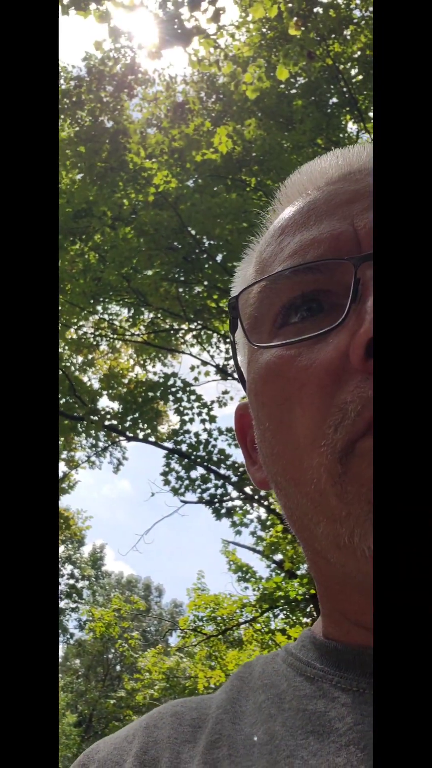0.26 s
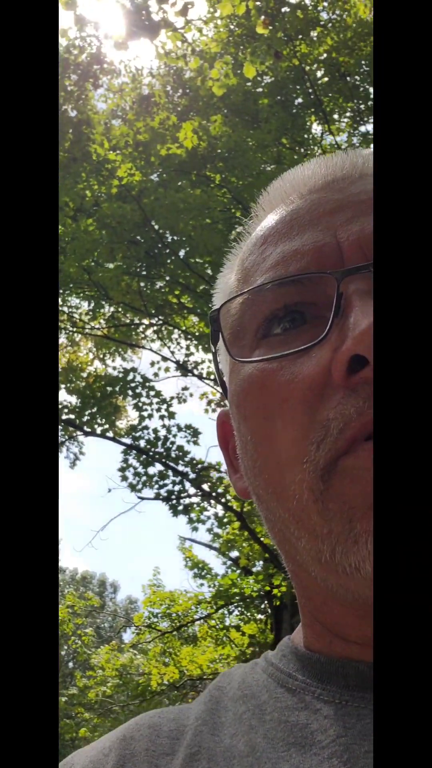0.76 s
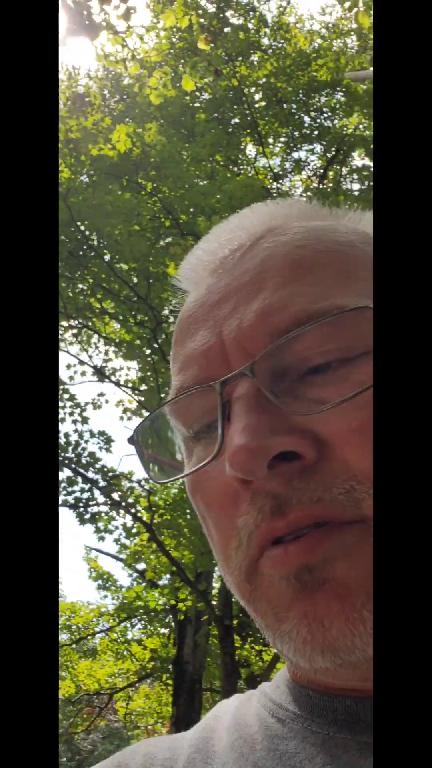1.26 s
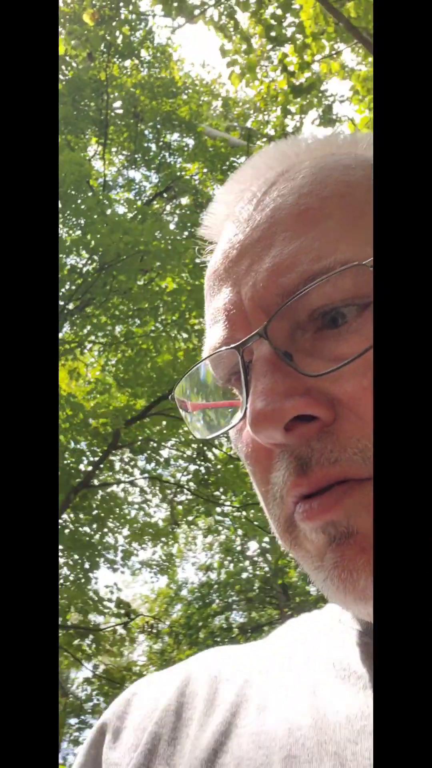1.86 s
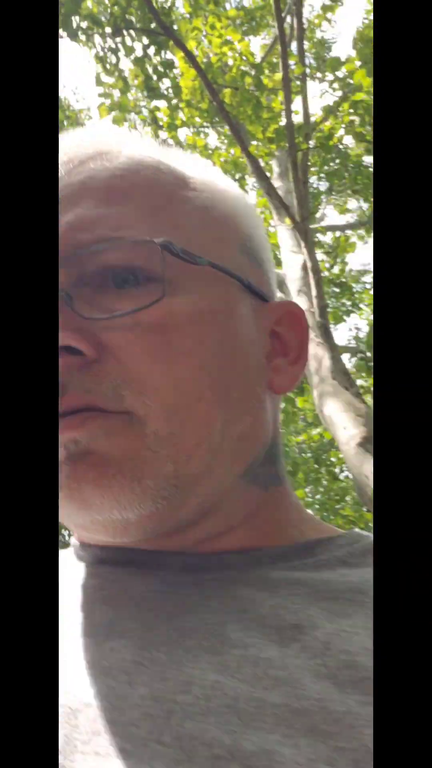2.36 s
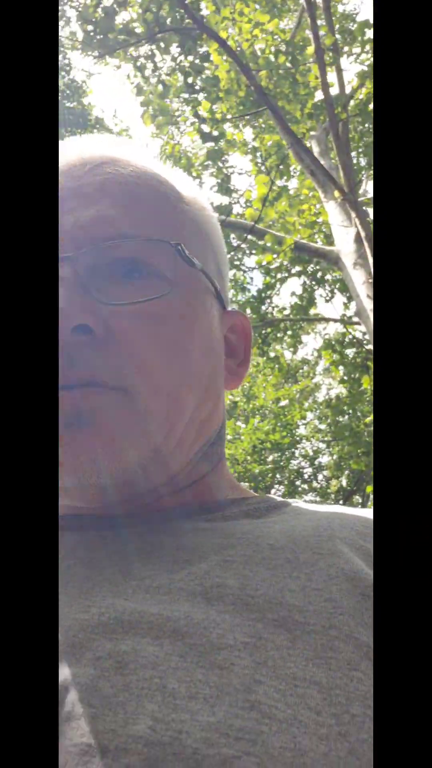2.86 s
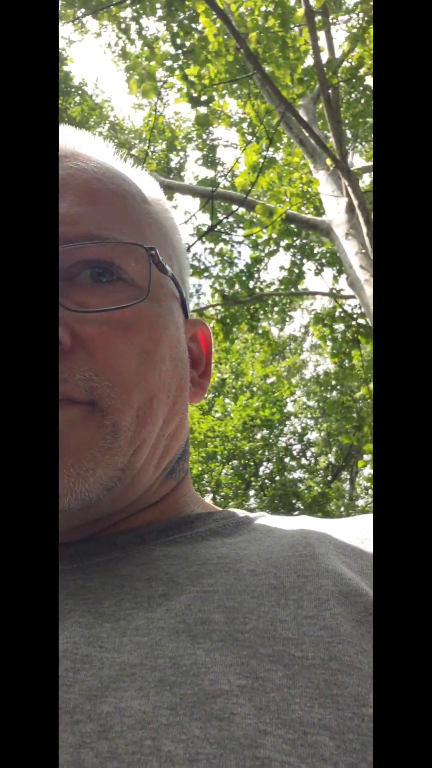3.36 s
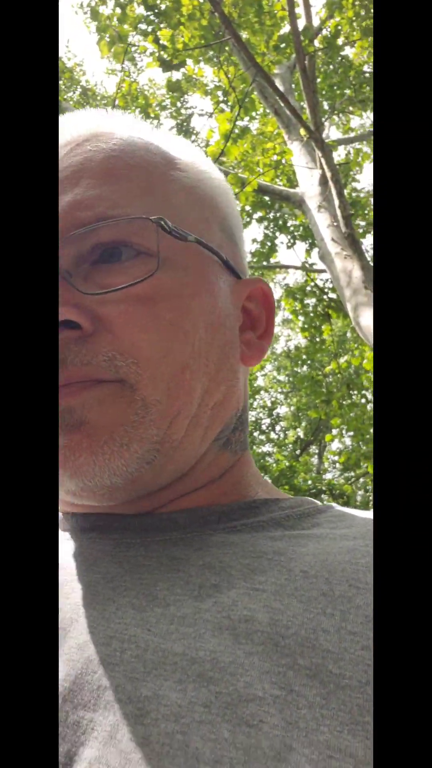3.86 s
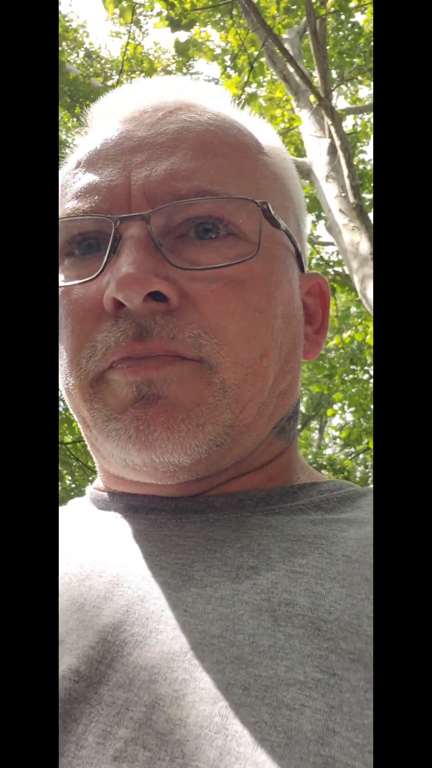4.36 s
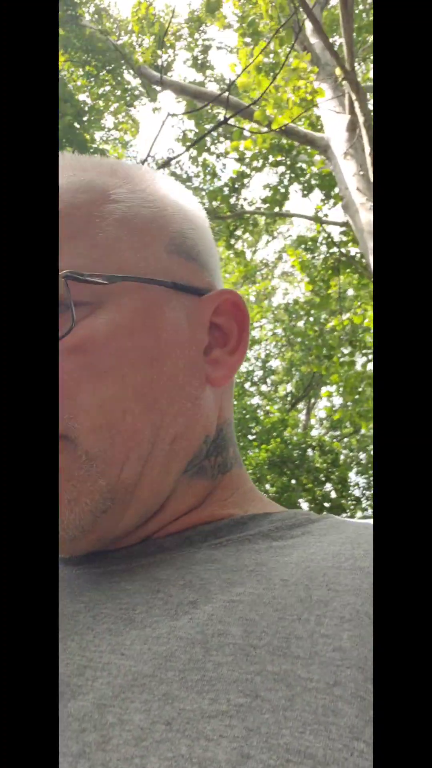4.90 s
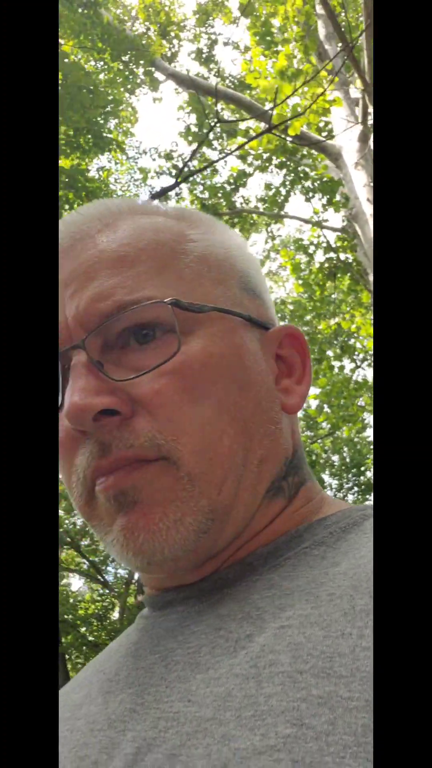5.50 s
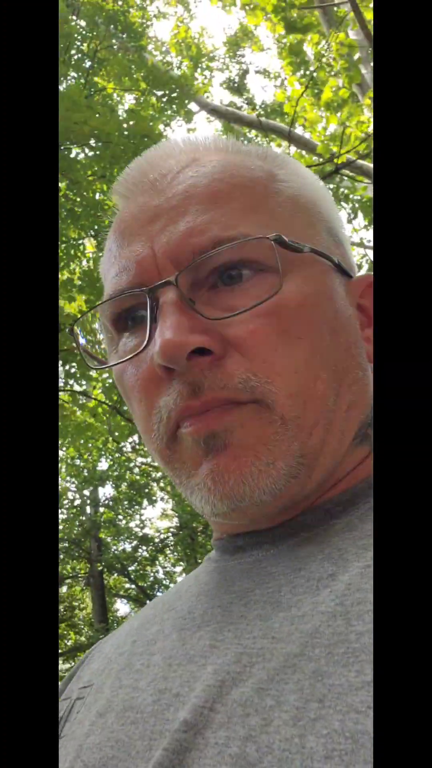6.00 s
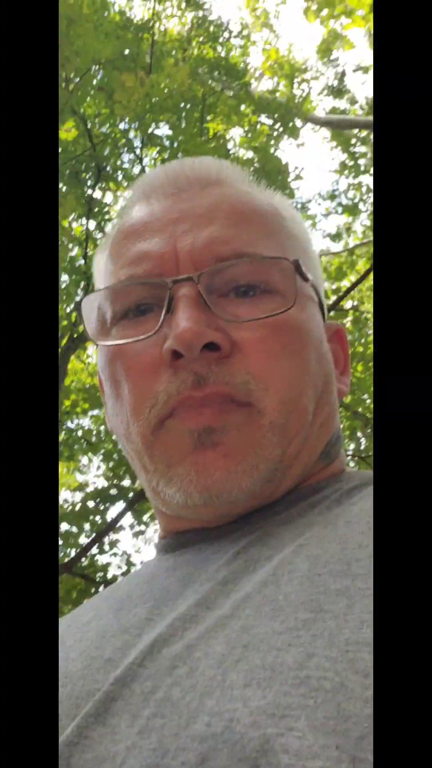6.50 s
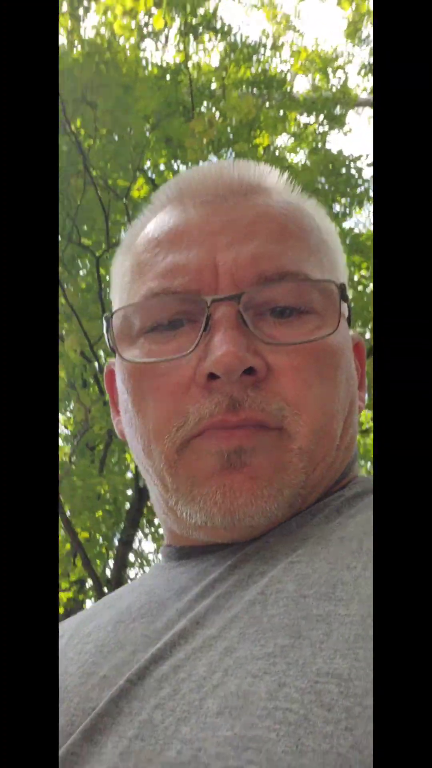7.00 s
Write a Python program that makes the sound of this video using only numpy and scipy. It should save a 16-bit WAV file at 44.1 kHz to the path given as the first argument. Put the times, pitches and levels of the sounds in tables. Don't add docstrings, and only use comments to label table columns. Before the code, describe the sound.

An electric starter clatters and whines for half a second, then a big V-twin catches with loud bangs, stumbles, and settles into a lumpy idle.

```python
import sys
import numpy as np
from scipy import signal
from scipy.fft import rfft, irfft
from scipy.io import wavfile
from scipy.ndimage import map_coordinates

SR = 44100
rng = np.random.default_rng(int(sys.argv[2]) if len(sys.argv) > 2 else 0)


def convert_level_to_amplitude(level_db):
    exponent = np.asarray(level_db, float) / 20
    return 10 ** exponent


def log_audio(samples):
    frames = np.atleast_2d(samples).T
    limited = np.clip(frames, -1, 1)
    pcm = np.round(limited * 32767).astype(np.int16)
    wavfile.write(sys.argv[1], SR, pcm)


N = 319725
TIME_S = np.arange(N) / SR

# (frequency [Hz], level [dB], t60 [s], polarity [+-1])
FRONT_PIPE_MODES = [(55.3, -13.1, 0.442, 1), (63.0, -20.6, 0.418, 1), (91.9, -14.2, 0.216, -1),
                    (108.3, -18.1, 0.277, -1), (142.1, -8.1, 0.148, -1), (188.1, -4.7, 0.078, -1),
                    (228.9, -12.9, 0.073, 1), (342.0, -12.0, 0.016, 1)]
REAR_PIPE_MODES = [(47.4, -14.8, 0.6, 1), (53.2, -10.7, 0.6, 1), (89.6, -15.0, 0.524, 1),
                   (103.6, -2.5, 0.127, -1), (139.0, -10.0, 0.163, -1), (179.9, -18.2, 0.244, -1),
                   (202.7, -2.7, 0.038, 1), (342.0, -24.1, 0.015, -1)]
# (time [s], pitch [ratio], front sharpness [dB/octave], rear sharpness [dB/octave])
PIPE_GAS = [(0.6, 0.962, -3.9, 5.5), (0.9, 1.113, 3.2, 6.0), (1.3, 1.083, 4.2, 5.0),
            (1.7, 1.031, -0.3, 4.9), (2.2, 0.973, 3.0, 4.2), (2.8, 0.983, -1.8, 0.4),
            (3.5, 0.989, 0.4, 0.1), (4.5, 0.994, -0.0, -0.0), (5.5, 0.998, -0.5, 0.4),
            (6.3, 0.995, -1.4, 0.4), (7.2, 1.001, -0.5, 0.1)]
# (time [s], level [dB], frequency [Hz], t60 [s])
FIRST_BANGS = [(.125, -23, 50, 0.182), (0.114, -23, 129, .1), (.268, -9, 114, 0.18), (.365, -13, 53, 0.15),
               (0.351, -19.5, 189.4, 0.1), (.54, -17, 65, 0.13), (0.576, -5, 94.7, 0.098),
               (.586, -3.5, 61.4, 0.176), (0.604, 3.5, 122, 0.085), (0.645, 0, 117.3, 0.083),
               (0.663, 2, 69, 0.074)]

# (frequency [Hz], density [dB per Hz])
AWAY_COLOUR = [(260, -27), (450, 1), (617, -6.5), (686, -7), (1030, -7.5), (1720, -12.5), (1910, -9.5),
               (2460, -19), (3530, -25), (3810, -23), (6360, -26.5), (8460, -25), (13700, -25),
               (15400, -24.5), (16400, -51)]
SIDE_ON_COLOUR = [(330, -69), (560, -6), (635, -7), (731, -2.5), (840, -7), (1130, -10), (1490, -13),
                  (1890, -9.5), (2210, -17), (2960, -22.5), (4600, -19), (6700, -19), (8500, -14.5),
                  (9700, -17.5), (10800, -12), (12400, -10), (15900, -14)]
TOWARDS_COLOUR = [(290, -35), (500, -2), (604, -12), (718, -10), (1110, -23.5), (1360, -18.5),
                  (1590, -22.5), (1790, -17), (1980, -22), (2250, -25), (2600, -30), (3580, -28),
                  (7000, -28.5), (8500, -26.5), (9720, -27), (13800, -21.5), (15900, -31.5)]
TURN_TIMES_S = (1.699, 2.198, 4.9, 5.5)
# (frequency [Hz], likeness [0-1])
PORT_LIKENESS = [(60, 1), (250, 0.42), (500, 0.74), (1000, 0.73), (2000, 0.13), (15000, 0.1)]
# (clatter [dB], hiss [dB], rasp [dB], rumble [dB])
POSE_LEVELS = [
    (-38, -49, -42, -27),
    (-38, -44, -35, -31),
    (-39, -49, -36.5, -30.5),
]
# (middles [dB], highs [dB], left lag [ms], booms [dB])
POSE_BALANCE = [
    (-5, -2.6, 0.353, .5),
    (-1.3, -5, .13, 0),
    (-1.5, -5.8, .14, -.6),
]
# (time [s], width [s], share [-1 to 1])
HAND_LEANS = [
    (2.3, 0.71, 0.46),
    (5.2, 0.35, -0.33),
    (6.6, 0.18, 0.6),
    (7.02, 0.073, 0.96),
]
LEAN_GAIN_DB = (2.5, 2, 6, 0.5)

# (frequency [Hz], density [dB per Hz])
STARTER_NOISE_COLOUR = [(190, -34), (330, 2), (401, 1.5), (429, -4), (585, 0), (986, -7), (1240, -1.5),
                        (1690, -5.5), (1840, -4.5), (2460, -10), (5860, -15), (7480, 0.5), (12600, 1.5),
                        (15600, 1), (16400, -29)]
# (time [s], whine [Hz], strain [0-1])
STARTER_CRANK = [
    (0, 249, .85),
    (.06, 232.8, 0.4),
    (.14, 214.5, 0.03),
    (.205, 295.2, 0.6),
    (.27, 135.6, 0.9),
    (.33, 236.5, 0.51),
    (.465, 244.2, 0.34),
    (.5, 275.3, 0.98),
    (.586, 167, 0.9),
]
# (at rest [dB], swing at full strain [dB])
STRAIN_LEVELS = [
    (-30.5, 8.4),
    (-46, 21.6),
    (-38, 11),
]
WHINE_HARMONICS_DB = (-8, -6, -14)
# (time [s], peak level [dB], rise [s], fall
# [s])
AIR_LEAKS = [
    (0, -19, .01, .15),
    (0.265, -16.5, 0.054, .035),
    (.36, -31, 0.13, 0.073),
    (0.419, -21, 0.0044, 0.057),
    (.538, -16.5, 0.045, 0.043),
    (.586, -26, .03, .08),
]
# (time [s], peak level [dB])
GEAR_TICKS_AT = [
    (.003, -29),
    (.096, -18),
    (.204, -22),
    (.222, -17),
    (.333, -25),
    (.382, -20),
    (.504, -15),
    (.569, -20),
    (.579, -19),
]
# (time [s], peak level [dB], t60 [s])
VALVE_SPITS = [
    (0.4175, -7.5, 0.042),
    (0.5871, -18, 0.045),
    (0.6153, -16, 0.048),
]
# (frequency [Hz], density [dB per Hz])
SPIT_NOISE_COLOUR = [(1760, -55), (3000, -28), (4630, -12.5), (5850, -21), (7500, -0.5), (8770, -6),
                     (12300, -12), (15100, -25), (16400, -41)]

# (cycle number, length of the four-stroke cycle [ms])
CYCLE_LENGTHS = [(0, 73.3), (1, 83.19), (2, 71.43), (4, 67.89), (10, 68.42), (15, 76.12), (16, 76.33),
                 (25, 87.46), (31, 87.65), (36, 93.6), (43, 91.93), (75, 92.43)]
HUNT_SLOWEST_CYCLES = [37.2, 42.28, 47.36, 52.44, 57.52, 62.6, 67.2, 71.1, 74.3, 77.4]
# (time [s], front level [dB], rear level [dB])
BURN_STRENGTH = [(.63, -.8, -4.9), (.7, .5, -2.3), (.78, 1, -2.1), (.92, -5.8, -1.8), (1.4, -5, -2),
                 (1.7, -3.4, -.9), (2.24, .1, -.3), (2.55, 1.2, -5), (3.15, 1.3, -6.6), (3.47, 0, -4.4),
                 (4.4, 1.2, -3.5), (5.5, 1.2, -1.9), (7.2, .4, -1.5)]
# (time [s], front loss [dB], rear loss [dB])
COLD_MISSES = [(.72, 0, 0), (.85, 0, 24), (.93, 0, 24), (1.05, 20, 24), (1.34, 20, 24), (1.47, 9.6, 19),
               (1.61, -2, 17.5), (1.92, -1.3, 12.7), (2.1, 0, 9.5), (2.33, 0, 9), (2.49, 0, 0)]
# (time [s], front level [dB], rear level [dB])
PIPE_JETS = [
    (.63, -27, -46),
    (.7, -50, -50),
    (.95, -48, -45),
    (1.95, -53, -51),
]
# (time [s], peak level [dB])
WARMING_JET_PUFFS = [(2.1107, -27), (2.2753, -23), (2.3377, -27), (2.409, -36), (2.4449, -28),
                     (2.5302, -28), (2.5871, -29), (2.6175, -28.5), (2.6734, -28), (2.7048, -30),
                     (2.7577, -28), (2.7936, -29), (2.848, -28), (2.8804, -30), (2.9358, -27),
                     (2.9687, -29), (3.0253, -28), (3.056, -36), (3.1122, -28), (3.1433, -35),
                     (3.2012, -26), (3.2336, -33), (3.291, -26), (3.3234, -34), (3.3798, -29),
                     (3.4137, -26), (3.47, -28), (3.5095, -27), (3.5679, -27), (3.6013, -30), (3.6607, -28),
                     (3.6937, -29), (3.754, -26), (3.7889, -30), (3.8453, -23), (3.8797, -31),
                     (3.9385, -25), (3.972, -28), (4.0283, -24), (4.0643, -28), (4.1206, -23),
                     (4.1565, -30), (4.2158, -25), (4.2503, -28), (4.3067, -25), (4.3406, -30),
                     (4.3955, -27), (4.4319, -29)]
IDLE_JET_PUFFS = [(4.4893, -24), (4.5262, -31), (4.5844, -25), (4.618, -33), (4.6769, -23), (4.7118, -30),
                  (4.7701, -17), (4.8599, -21), (4.8929, -36), (4.9512, -23), (5.044, -22), (5.1358, -22),
                  (5.1722, -30), (5.2291, -28), (5.2626, -32), (5.3201, -24), (5.3568, -31),
                  (5.4107, -23.5), (5.4496, -30), (5.5035, -24.5), (5.5429, -29), (5.5973, -25),
                  (5.6352, -28), (5.6876, -22), (5.7275, -30), (5.7797, -23), (5.82, -27), (5.8726, -23),
                  (5.9106, -32), (5.9644, -21), (6.0048, -27), (6.0577, -22.5), (6.0966, -29), (6.149, -22),
                  (6.1884, -32), (6.239, -20), (6.2771, -28), (6.3326, -22), (6.3715, -25), (6.4259, -25),
                  (6.4668, -25), (6.5201, -18.5), (6.5581, -25), (6.6095, -19), (6.6479, -24),
                  (6.6793, -30), (6.7012, -18.5), (6.7417, -22), (6.7731, -31), (6.7965, -22.5),
                  (6.836, -27), (6.8883, -19.5), (6.9262, -30), (6.9786, -17.5), (7.0185, -21),
                  (7.0505, -30), (7.0729, -19.5), (7.1128, -18.5), (7.1655, -20), (7.2046, -23)]
# (level [dB], fading [s])
CATCH_FLARE = [
    (7.5, 0.32),
    (9, 0.24),
    (17, 0.35),
    (4.5, 0.39),
]
# (share of the cycle [0-1], level over the hiss [dB])
VALVE_SEATINGS = [
    (.12, 1.5),
    (.345, 3.5),
    (.58, -5.5),
    (.77, 2.5),
]
# (time [s], peak level [dB])
ROUGH_KNOCKS = [(0.593, -6), (0.627, -17), (0.657, -12.5), (0.715, -15), (0.764, -19.5), (0.799, -14),
                (0.868, -17.5), (1.5, -29), (1.646, -25), (1.8, -27), (1.92, -31), (1.952, -26),
                (2.671, -30), (3.661, -30), (4.583, -21), (4.86, -24), (4.95, -25), (5.045, -29),
                (5.136, -24), (5.871, -27), (6.701, -25), (7.242, -15)]
# (time [s], frequency [Hz], level [dB])
MUFFLER_RASP = [
    (1.0, 428.3, 0),
    (1.8, 428, -1.5),
    (2.45, 422, -2),
    (2.9, 392.8, 0.5),
    (4.9, 398, 0),
    (5.5, 409.8, 0),
    (6.3, 418, 1.5),
    (7.2, 415.6, 1.5),
]

# (time [s], level [dB], width [s], frequency [Hz])
BRIEF_SQUEAKS = [
    (.05, -37, .02, 13070),
    (.085, -26, .012, 13070),
    (.335, -33, .01, 13130),
    (.382, -20, 0.0085, 13330),
    (1.108, -28, 0.0029, 3800),
]
# (start [s], end [s], first frequency [Hz], last frequency [Hz], level [dB], width [share of pitch])
CAVITIES = [(0.09, 0.23, 2480, 2560, -34, .05), (.33, .43, 2480, 2540, -37, .035),
            (0.62, 1.75, 2520, 2420, -45, 0.041), (-0.01, .07, 1880, 1700, -38, .04),
            (0.09, 0.13, 1950, 1900, -37, .05), (0.23, 0.26, 1800, 1930, -29, 0.044),
            (0.4344, .56, 1830, 2100, -29.5, 0.051), (0.52, .9, 1880, 1920, -44, .035),
            (1.3, 2.6, 1940, 1930, -43, 0.033), (2.5, 3.3, 1945, 1920, -40, 0.017),
            (3, 5.2, 1860, 1770, -44, 0.025), (4.8, 6.2, 1790, 1830, -46, .04),
            (1.68, 2.9, 770, 760, -43.5, 0.045), (2.5, 5.25, 742, 742, -43.5, .016),
            (0.23, 0.57, 4150, 5200, -47, .035), (0.16, .2, 4500, 5300, -42.5, .03),
            (0.11, 0.23, 1200, 1230, -33.5, .035), (0.32, 0.34, 1200, 1500, -37, .05),
            (0.4344, .535, 3080, 2950, -38, 0.04), (0.22, .27, 3000, 3300, -37.5, .06),
            (0.4956, 0.61, 690, 650, -34, .06), (0.37, .4, 700, 740, -38, 0.052),
            (0.03, .08, 375, 410, -34, 0.04), (0.63, .65, 6000, 4700, -45, .035)]
# (start [s], end [s], frequency [Hz], width [Hz], level [dB])
FACING_PANELS = [
    (1.36, 2.4, 1040, 300, -38),
    (2.24, 3.04, 520, 63, -45),
    (4.86, 5.902, 2400, 300, -47),
    (6.1, 6.494, 4300, 460, -45),
    (5.9, 7.4, 520, 82, -37),
    (5.05, 5.6, 1480, 130, -46.5),
    (6.05, 7.4, 1400, 100, -46),
    (5.1, 5.5, 480, 65, -43),
    (6.93, 7.4, 2480, 360, -39.5),
    (6.15, 7, 3900, 670, -49),
]

FIRST_FIRING_S, CYCLES = .6264, 77
MISSED_JET_DB, JET_LUCK_DB, KNOCK_LUCK_DB = -53, 4, 3.0
PANEL_FADE_SHARE = 0.2


def unit_rms(x):
    return x / np.sqrt(np.mean(x ** 2) + 1e-20)


def in_time(rows):
    s, *columns = np.transpose(rows)
    return [np.interp(TIME_S, s, column) for column in columns]


def at_hz(points, hz):
    points = np.array(points)
    return np.interp(np.log(hz), np.log(points[:, 0]), points[:, 1])


def smooth(x, hz):
    r = np.exp(-2 * np.pi * hz / SR)
    return signal.lfilter([1 - r], [1, -r], x)


def band(x, low_hz, high_hz):
    return signal.sosfilt(signal.butter(3, [low_hz, high_hz], "band", fs=SR, output="sos"), x)


def drift(rate):
    return unit_rms(smooth(smooth(rng.standard_normal(N), rate), rate))


def narrow(hz, width_hz):
    wander = rng.standard_normal(N) + 1j * rng.standard_normal(N)
    wander = smooth(smooth(wander, width_hz), width_hz)
    phase = 2 * np.pi * np.cumsum(hz + np.zeros(N)) / SR
    return unit_rms(np.real(wander * np.exp(1j * phase)))


def stereo_white():
    mid, side = rfft(rng.standard_normal((2, N)))
    alike = np.clip(at_hz(PORT_LIKENESS, np.arange(len(mid)) * SR / N + 1), 0, 1)
    return np.sqrt(1 + alike) * mid + np.sqrt(1 - alike) * side * [[1], [-1]]


def coloured(white, colour):
    return irfft(white * convert_level_to_amplitude(at_hz(colour, np.arange(white.shape[1]) * SR / N + 1)), N)


def clicks(s, db):
    out = np.zeros(N)
    at = np.round(np.asarray(s) * SR).astype(int)
    out[at[at < N]] = convert_level_to_amplitude(db)[at < N]
    return out + 1e-18


def puffs(s, db, rise_ms, t60):
    fall = signal.lfilter([1], [1, -convert_level_to_amplitude(-60 / (t60 * SR))], clicks(s, db))
    return smooth(smooth(fall, 300 / rise_ms), 300 / rise_ms)


def struck(s, db, hz, t60):
    r, w = convert_level_to_amplitude(-60 / (t60 * SR)), 2 * np.pi * hz / SR
    ring = signal.lfilter([0, np.sin(w)], [1, -2 * r * np.cos(w), r * r], clicks(s, db))
    return smooth(ring, 165)


def poses():
    away = np.interp(TIME_S, TURN_TIMES_S[:2], [1, 0])
    towards = np.interp(TIME_S, TURN_TIMES_S[2:], [0, 1])
    return np.array([away, 1 - away - towards, towards])


def strokes():
    k = np.arange(CYCLES)
    turn = np.interp(k, HUNT_SLOWEST_CYCLES, np.arange(len(HUNT_SLOWEST_CYCLES)))
    hunt_ms = np.interp(k, (62, 68), (.98, 2.8))
    hunt = hunt_ms * np.cos(2 * np.pi * turn) * (k > HUNT_SLOWEST_CYCLES[0])
    cycle = (np.interp(k, *np.transpose(CYCLE_LENGTHS)) + hunt) / 1000
    s = FIRST_FIRING_S + np.cumsum(cycle) - cycle
    rear_share = np.append((.532, .435, .437), np.full(CYCLES - 3, .412))

    def at_firings(rows):
        times, *columns = np.transpose(rows)
        return np.array([np.interp(s, times, column) for column in columns])

    front_db, rear_db = at_firings(BURN_STRENGTH)
    loss = at_firings(COLD_MISSES) * np.array([k % 2 == 0, k % 2 == 1])
    cold_until_s = 2.05
    no_jet = (loss > 5) | (s > cold_until_s)
    front_jet, rear_jet = np.where(no_jet, MISSED_JET_DB, at_firings(PIPE_JETS))
    quick = np.minimum(hunt, 0)
    return ((s, front_db - loss[0], front_jet),
            (s + rear_share * cycle, rear_db - loss[1] + 0.7 * quick, rear_jet - quick))


def singing():
    out = 0
    for start, end, first_hz, last_hz, db, width in CAVITIES:
        fade_s = min(PANEL_FADE_SHARE * (end - start), 0.32)
        fade = np.clip(np.minimum(TIME_S - start, end - TIME_S) / fade_s, 0, 1)
        hz = np.interp(TIME_S, [start, end], [first_hz, last_hz]) * (1 + .006 * drift(1.517))
        out = out + convert_level_to_amplitude(db + 1.3 * drift(7.6)) * fade * narrow(hz, abs(width) * first_hz)
    for s, db, width, hz in BRIEF_SQUEAKS:
        out = out + convert_level_to_amplitude(db) * np.exp(-((TIME_S - s) / width) ** 2) * np.sin(2 * np.pi * hz * TIME_S)
    return out


def panels():
    (front, front_db, _), (rear, rear_db, _) = strokes()
    luck = 3.3 * rng.standard_normal((len(front), 2))
    flash = .15 + puffs(front - .002, front_db + luck[:, 0], rise_ms=1.0, t60=0.1)
    flash += puffs(rear - .001, rear_db - 1.0 + luck[:, 1], rise_ms=0.92, t60=0.11)
    out = 0
    for start, end, hz, width_hz, db in FACING_PANELS:
        fade_s = PANEL_FADE_SHARE * (end - start)
        fade = np.clip(np.minimum(TIME_S - start, end - TIME_S) / fade_s, 0, 1)
        out = out + convert_level_to_amplitude(db) * fade * narrow(hz, width_hz)
    return out * unit_rms(flash)


def cranking():
    whine_hz, strain = in_time(STARTER_CRANK)
    clatter_db, whine_db, rumble_db = (rest + swing * strain ** power for (rest, swing), power
                                       in zip(STRAIN_LEVELS, (2.5, .8, 1.5)))
    floor_db = -40
    leaks = [np.interp(TIME_S, [s - rise, s, s + fall], [floor_db, db, floor_db])
             for s, db, rise, fall in AIR_LEAKS]
    return clatter_db, np.max(leaks, axis=0), whine_hz, whine_db, rumble_db


def gear_clatter(noise):
    edges_hz = [380, 560, 850, 1300, 1900, 2750, 4000, 6200]
    return unit_rms(sum(band(noise, low, high) * convert_level_to_amplitude(2.0 * drift(18))
                        for low, high in zip(edges_hz, edges_hz[1:])))


def starter():
    clatter_db, leak_db, whine_hz, whine_db, rumble_db = cranking()
    white = stereo_white()
    noise = coloured(white, STARTER_NOISE_COLOUR)
    out = convert_level_to_amplitude(clatter_db) * gear_clatter(noise)
    out += convert_level_to_amplitude(leak_db) * unit_rms(band(noise, 4650, 19000))
    for k, db in enumerate((0, *WHINE_HARMONICS_DB)):
        out += convert_level_to_amplitude(whine_db + db) * np.sin(2 * np.pi * (k + 1) * np.cumsum(whine_hz) / SR)
    out += convert_level_to_amplitude(rumble_db) * unit_rms(band(irfft(white, N), 152, 307))
    crank_turns = np.where(TIME_S > .11, 1, .3)
    out += convert_level_to_amplitude(-38.5) * unit_rms(band(irfft(white, N), 35, 113)) * crank_turns
    tick_s, tick_db = np.transpose(GEAR_TICKS_AT)
    out += unit_rms(band(noise, 550, 3700)) * puffs(tick_s, tick_db - 4.0, rise_ms=0.7, t60=0.027)
    spit_noise = unit_rms(coloured(white, SPIT_NOISE_COLOUR))
    spits = sum(spit_noise * puffs([s], np.array([db - 2.0]), rise_ms=0.86, t60=t60)
                for s, db, t60 in VALVE_SPITS)
    return out * np.interp(TIME_S, [.58, .66], [1, 0]) + spits


def noise_levels():
    lean = sum(share * np.exp(-((TIME_S - s) / width) ** 2) for s, width, share in HAND_LEANS)
    flare = [db * np.exp(-np.maximum(TIME_S - .56, 0) / fading) for db, fading in CATCH_FLARE]
    return np.transpose(POSE_LEVELS) @ poses() + flare + np.outer(LEAN_GAIN_DB, lean)


def posed_noise(white):
    low, high = 0, 0
    for share, colour in zip(poses(), (AWAY_COLOUR, SIDE_ON_COLOUR, TOWARDS_COLOUR)):
        noise = coloured(white, colour)
        low = low + np.sqrt(share) * unit_rms(band(noise, 512, 4100))
        high = high + np.sqrt(share) * unit_rms(band(noise, 5100, 21500))
    return low, high


def gas_jets():
    (front, _, front_db), (rear, _, rear_db) = strokes()
    luck = JET_LUCK_DB * rng.standard_normal((len(front), 2))
    jet = puffs(front - .0025, front_db + luck[:, 0] + 11.0, rise_ms=3.4, t60=0.025)
    jet += puffs(rear - .002, rear_db + luck[:, 1] + 4.5, rise_ms=1.4, t60=0.074)
    s, db = np.transpose(WARMING_JET_PUFFS)
    jet += puffs(s - .001, db - 7.0, rise_ms=1.5, t60=0.042)
    s, db = np.transpose(IDLE_JET_PUFFS)
    return jet + puffs(s - .001, db - 2.5, rise_ms=2.0, t60=0.026)


def valve_seating(front, luck):
    cycle = np.diff(front, append=front[-1] + 0.065)
    return sum(puffs(front + share * cycle, db + 4.6 * luck[:, k], rise_ms=1.6, t60=0.032)
               for k, (share, db) in enumerate(VALVE_SEATINGS))


def firing_knocks(luck):
    (front, front_db, _), (rear, rear_db, _) = strokes()
    knock = puffs(front - .001, front_db + 2.5 + KNOCK_LUCK_DB * luck[:, 4], rise_ms=0.57, t60=0.034)
    return knock + puffs(rear, rear_db - 2.5 + KNOCK_LUCK_DB * luck[:, 5], rise_ms=0.68, t60=0.024)


def muffler(white, rasp_db, rumble_db, luck):
    away = poses()[0]
    (front, front_db, _), (rear, rear_db, _) = strokes()
    swell = 0.64 + puffs(front + 0.0033, front_db + 2.8 * luck[:, 3], rise_ms=3.6, t60=0.1)
    swell += puffs(rear + .004, rear_db - 6.0, rise_ms=5.9, t60=0.22)
    rasp_hz, turn_db = in_time(MUFFLER_RASP)
    rasp = convert_level_to_amplitude(rasp_db + turn_db) * unit_rms(narrow(rasp_hz, 27.7) * (swell - .33))
    bark = struck(front + .004, front_db - 19 + 2.5 * luck[:, 3], hz=402, t60=.11)
    boom_noise = band(band(irfft(white, N), 125.3, 267.5), 127, 301)
    rumble = convert_level_to_amplitude(rumble_db + 0.5) * unit_rms(boom_noise * (swell - .2 - .2 * away))
    return rasp + (1 - away) * bark + rumble


def engine_noise(clatter_db, hiss_db, rasp_db, rumble_db):
    white, shares = stereo_white(), poses()
    towards = shares[2]
    low, high = posed_noise(white)
    front = strokes()[0][0]
    luck = rng.standard_normal((len(front), 6))
    valve = valve_seating(front, luck)
    hiss = high * convert_level_to_amplitude(hiss_db) * (0.96 - 0.16 * towards + 0.87 * valve)
    hiss += (high - 0.43 * smooth(high, 3600)) * gas_jets()
    knock_share = 0.51 + 1.27 * towards
    clatter = low * convert_level_to_amplitude(clatter_db) * (1.0 + knock_share * firing_knocks(luck) + 0.63 * valve)
    s, db = np.transpose(ROUGH_KNOCKS)
    clatter += band(low, 480, 3000) * puffs(s, db - 6, rise_ms=0.6, t60=0.031)
    turning = np.sqrt(shares).sum(0)
    return (hiss + clatter) / turning + muffler(white, rasp_db, rumble_db, luck)


def pumping(level_db):
    s, db, _ = np.hstack(strokes())
    missed = s[db < -9] - .004
    push_db = np.repeat([-5.5, 1.5], CYCLES)[db < -9]
    modes = [(55.0, 13.8, 0.12), (71.6, 2.1, 0.24), (133.6, 2.9, 0.28), (195.0, 4.5, 0.14)]   # (Hz, dB, t60 s)
    return convert_level_to_amplitude(level_db) * sum(struck(missed, mode_db + push_db, hz, t60) for hz, mode_db, t60 in modes)


def exhaust():
    out, t = np.zeros(N + SR), np.arange(int(.28 * SR)) / SR
    coarse = t[::5]
    gas_s, pitch, *sharpness = np.transpose(PIPE_GAS)
    for (times, dbs, _), pipe, sharp in zip(strokes(), (FRONT_PIPE_MODES, REAR_PIPE_MODES), sharpness):
        hz, mode_db, t60, sign = np.transpose(pipe)[:, :, None]
        octaves = np.log2(np.minimum(hz, 240) / 100)
        for s, db in zip(times, dbs):
            u = coarse * np.interp(s, gas_s, pitch)
            level_db = db + mode_db + np.interp(s, gas_s, sharp) * octaves - 60 * u / t60
            ring = (sign * convert_level_to_amplitude(level_db) * np.sin(2 * np.pi * hz * u)).sum(0)
            out[round(s * SR):][:len(t)] += np.interp(t, coarse, ring)
    out = smooth(out[:N], 230)
    weak_hz, weak_width_hz = 336, 77
    hidden = signal.lfilter(*signal.iirpeak(weak_hz, weak_hz / weak_width_hz, SR), out)
    return out - np.array((.45, .05, .35)) @ poses() * hidden


def scene():
    middle_db, high_db, lag_ms, boom_db = np.transpose(POSE_BALANCE) @ poses()
    boom = convert_level_to_amplitude(np.interp(TIME_S, [1.8, 2.6], [1.5, .4])) * exhaust() + pumping(-20.5)
    boom += sum(struck([s], np.array([db]), hz, t60) for s, db, hz, t60 in FIRST_BANGS)
    boom = signal.sosfiltfilt(signal.butter(5, 36, "high", fs=SR, output="sos"), boom)
    running = np.interp(TIME_S, [.56, .62], [0, 1])
    noise = singing() + panels() + starter() + running * engine_noise(*noise_levels())
    middles = signal.sosfiltfilt(signal.butter(2, 4500, fs=SR, output="sos"), noise)
    highs = noise - middles
    side = np.array([[.5], [-.5]])
    left, right = boom * convert_level_to_amplitude(side * boom_db) + middles * convert_level_to_amplitude(side * middle_db) + highs * convert_level_to_amplitude(side * high_db)
    left = .97 * left + .36 * smooth(smooth(left, 60), 60)
    left = map_coordinates(left, [np.arange(N) - lag_ms * SR / 1000], order=3)
    return np.array([left, right])


def roll_off(x):
    return signal.sosfilt(signal.butter(12, 16600, fs=SR, output="sos"), x)


def record(dry):
    rounded = np.sign(dry) * (.8 + .2 * np.tanh((abs(dry) - .8) / .2))
    limited = np.where(abs(dry) > .8, rounded, dry)
    mix = signal.sosfilt(signal.cheby2(14, 20, 16200, fs=SR, output="sos"), limited)
    return roll_off(mix)


dry = scene()
out = record(dry)
log_audio(out)
```